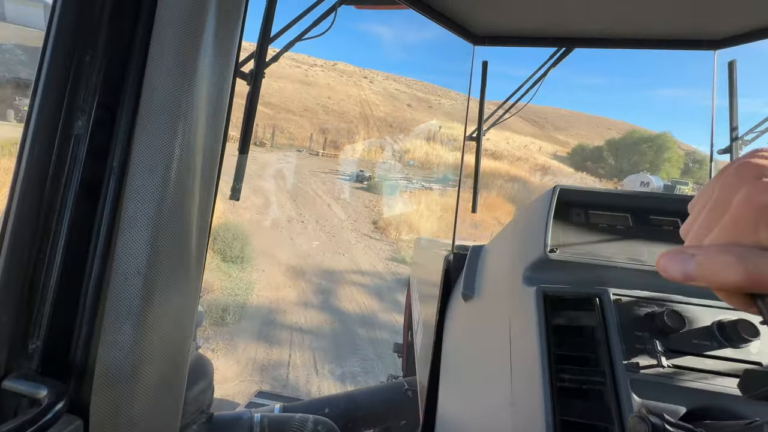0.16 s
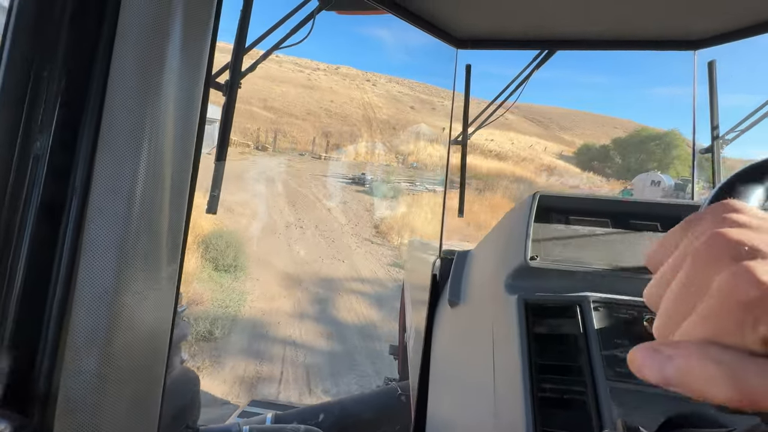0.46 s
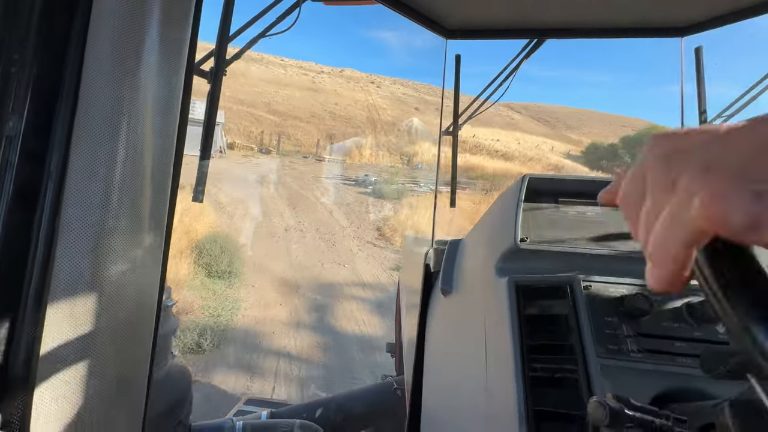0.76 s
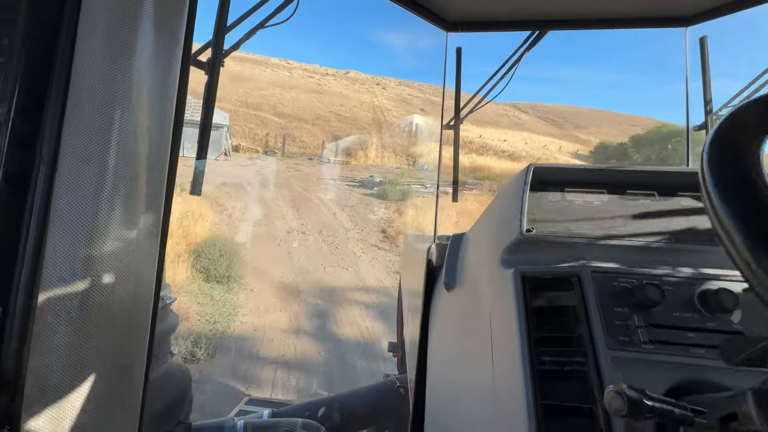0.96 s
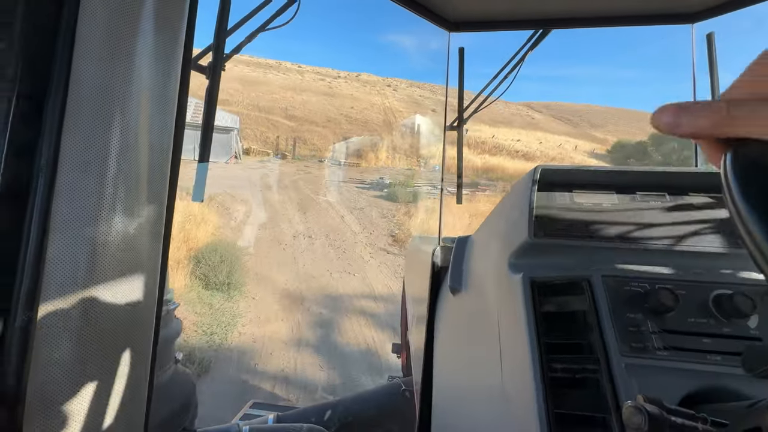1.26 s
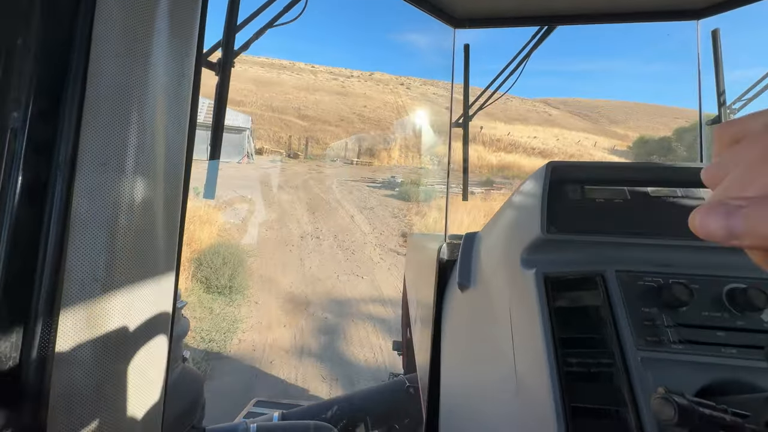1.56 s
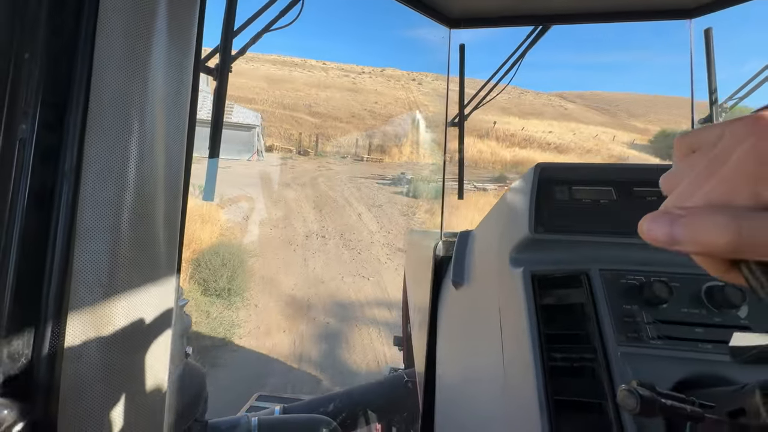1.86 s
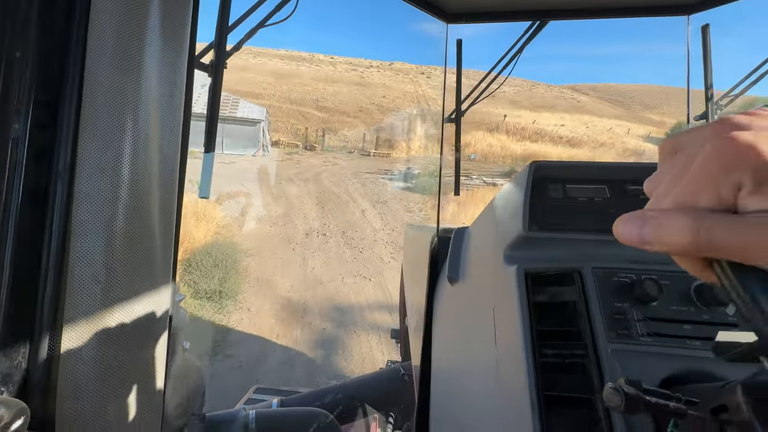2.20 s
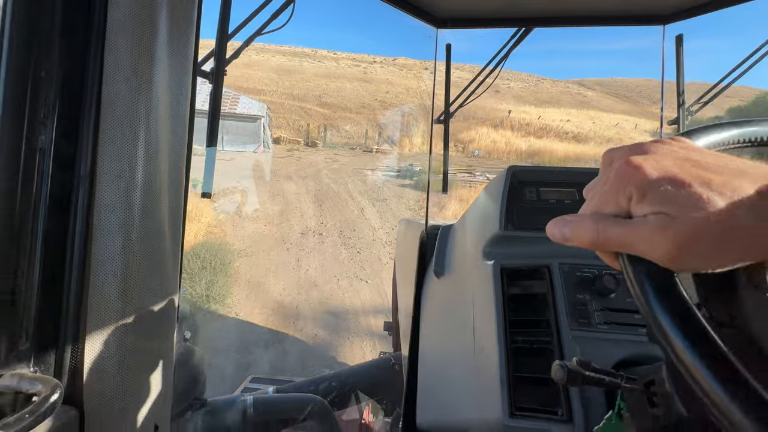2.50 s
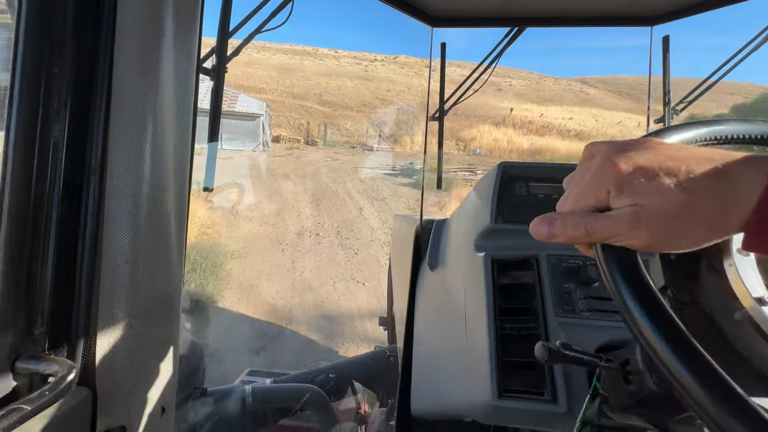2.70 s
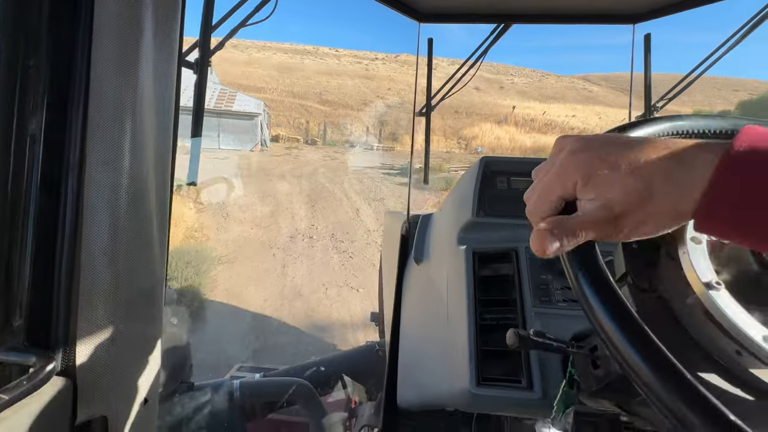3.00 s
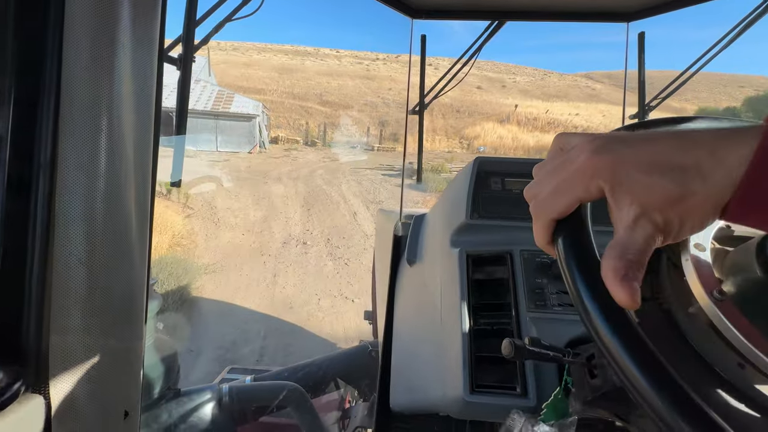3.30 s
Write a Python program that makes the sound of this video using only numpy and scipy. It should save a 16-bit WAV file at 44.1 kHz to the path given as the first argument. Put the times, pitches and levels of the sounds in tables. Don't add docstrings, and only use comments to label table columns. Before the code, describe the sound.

Steady heavy diesel engine drone heard in a tractor cab rolling over dirt, with small rattles.

```python
import sys
import numpy as np
from scipy import signal
from scipy.fft import rfft, irfft
from scipy.io import wavfile
from scipy.ndimage import uniform_filter1d

SR = 44100
rng = np.random.default_rng(int(sys.argv[2]) if len(sys.argv) > 2 else 0)


def log_audio(samples):
    frames = np.atleast_2d(samples).T
    limited = np.clip(frames, -1, 1)
    pcm = np.round(limited * 32767).astype(np.int16)
    wavfile.write(sys.argv[1], SR, pcm)


def volts_from_decibels(level):
    exponent = np.asarray(level, float) / 20
    return 10 ** exponent


N = 152145

# f/Hz, density/dB per Hz
ROAR_SPECTRUM = [(105, 5.5), (170, -7), (400, -9.5), (700, -11), (820, -12.5), (1200, -12.5), (1600, -19),
                 (2300, -22), (3600, -38)]
HISS_FOLLOWS = 0.57


def rms_one(x):
    return x / np.sqrt(np.mean(x ** 2) + 1e-20)


def in_time(rows):
    return np.interp(np.arange(N) / SR, *np.transpose(rows))


def at_hz(points, hz):
    table = np.array(points)
    return np.interp(np.log(hz), np.log(table[:, 0]), table[:, 1])


def drift(rate):
    r = np.exp(-80 * np.pi * rate / SR)
    slow = signal.lfilter([1], [1, -2 * r, r * r], rng.standard_normal(N // 40 + 2002))[2000:]
    return np.interp(np.arange(N) / 40, np.arange(len(slow)), rms_one(slow - slow.mean()))


def pan(left_db):
    return volts_from_decibels([[left_db / 2], [-left_db / 2]])


def band_pass(x, low, high, order=2):
    return signal.sosfilt(signal.butter(order, [low, high], "band", fs=SR, output="sos"), x)


def ring(clicks, hz, t60):
    r = volts_from_decibels(-60 / (t60 * SR))
    w = 2 * np.pi * hz / SR
    return signal.lfilter([0, np.sin(w)], [1, -2 * r * np.cos(w), r * r], clicks + 1e-18)


def tone(turns, db, left_db, lead):
    phase = 2 * np.pi * (turns + rng.random()) + np.array([[lead / 2], [-lead / 2]])
    return np.sqrt(2) * volts_from_decibels(db) * pan(left_db) * np.sin(phase)


def stereo_white():
    # f/Hz, left-right likeness/1
    likeness = [(60, .97), (165, .95), (300, .45), (700, .0), (1300, -.35), (2300, .05), (9000, .0)]
    port_lag_s, port_null_hz, port_from_hz, port_sharpness = .00034, 12650, 9600, 1.9
    hz = np.arange(N // 2 + 1) * SR / N + 1
    comb = np.cos(2 * np.pi * (hz - port_null_hz) * port_lag_s)
    ports = np.tanh(-port_sharpness * comb) * np.clip((hz - port_from_hz) / 1500, 0, 1)
    alike = np.clip(at_hz(likeness, hz) + ports, -.995, .995)
    mid, side = rfft(rng.standard_normal((2, N)))
    mid = irfft(mid * np.sqrt(1 + alike), N)
    side = irfft(side * np.sqrt(1 - alike), N)
    return np.array([mid + side, mid - side])


def banded_noise(spectrum, patchy_db, swing_db):
    # f/Hz, left minus right level/dB
    balance = [(110, 2), (250, -10.5), (700, 1.5), (1300, 5), (2200, 0.5), (4000, 4.5), (7300, 9),
               (9200, -6.5), (10500, 0)]
    out, together = 0, drift(11.0)
    white = [stereo_white(), stereo_white()]
    edges = np.geomspace(spectrum[0][0], min(spectrum[-1][0], 16500), num=17)
    for k, (low, high) in enumerate(zip(edges, edges[1:])):
        hz = np.sqrt(low * high)
        flicker_db = patchy_db * (0.29 * together + drift(26))
        band = band_pass(white[k % 2], low, high) * pan(at_hz(balance, hz))
        out = out + band * volts_from_decibels(at_hz(spectrum, hz) + flicker_db)
    return rms_one(out) * volts_from_decibels(swing_db)


def orders(cycles, load_db):
    multiples = [4, 6, 10, 12, 14, 15, 16, 20, 24, 26, 30, 32, 33, 34, 35, 36, 39, 40, 42, 46, 48, 51, 57,
                 58, 60, 72, 75, 76, 81, 45, 54, 56, 59, 63, 66, 68, 80, 96]
    # level/dB, left minus right/dB, left leads/rad
    order_sound = [(-40.3, 1.2, -0.0), (-18.8, 3.9, -0.2), (-47.5, 5.8, 0.3), (-49.7, -6.4, -1.4),
                   (-46.8, 4.0, 0.3), (-47, -3.0, -0.1), (-49.1, -5.1, 1.2), (-46.4, 4.1, 0.5),
                   (-50.6, -4.4, 0.2), (-50.4, -3.4, -0.8), (-46.7, 11.0, -3.1), (-50.4, -5.5, 2.4),
                   (-43, 9.4, -0.0), (-43.2, 3.8, -1.0), (-49.5, 0.4, -0.5), (-51.6, -2.8, 1.4),
                   (-43.3, 2.2, 0.8), (-52.4, 1.8, -1.5), (-53.3, 0.7, -1.1), (-49.7, 5.8, -2.8),
                   (-51.1, 1.7, 1.7), (-52.7, 7.7, 2.9), (-44, -1.6, -0.1), (-48, 2.1, -0.1),
                   (-52.1, 7.1, 2.8), (-54.4, -1.5, -2.5), (-57, 5.9, 2.8), (-54.2, 0.1, -1.9),
                   (-53.4, 4.9, -2.5), (-49, -4, -1.6), (-56, -1, .7), (-58, -3, -1), (-58, 2, .5),
                   (-58, -2, -2.6), (-57, 5, -1.6), (-55, -2, -1.9), (-53, 4, -2.6), (-56, 1, -2.8)]
    out = 0
    for k, (db, left_db, lead) in zip(multiples, order_sound):
        if k == 6:
            swing = .35 * drift(7.8) + 0.47 * load_db + 0.15
        else:
            swing = 1.1 * drift(3) + 0.29 * load_db - 1.5
        out = out + tone(k * cycles, db + swing, left_db, lead)
    return out


def faint_orders(cycles):
    level_db, spread_db = -44.5, 3
    k = np.arange(7, 140)
    height_db = at_hz(ROAR_SPECTRUM, k * 20.0) + spread_db * rng.standard_normal((2, len(k)))
    shape = np.zeros((2, 1025), complex)
    shape[:, k] = volts_from_decibels(height_db) * np.exp(2j * np.pi * rng.random((2, len(k))))
    loop = rms_one(irfft(shape))
    place = np.arange(2048) / 2048
    return volts_from_decibels(level_db) * np.array([np.interp(cycles % 1, place, c, period=1) for c in loop])


def panels(cycles, load_db):
    # f/Hz, t60/s, level/dB, left minus right/dB
    panel_modes = [(888, 0.17, -51, -13), (608, 0.038, -56.5, 25), (1197, .05, -56, -11),
                   (1472, 0.12, -59.5, -10), (1732, 0.081, -58.5, -13), (2013, 0.062, -61, -7),
                   (3148, 0.041, -67, 20)]
    cylinder_spread_db, firing_spread_db = 4, 2.5
    count = (6 * cycles).astype(int)
    at = np.flatnonzero(np.diff(count)) + 1
    cylinder = count[at] % 6
    out = 0
    for hz, t60, db, left_db in panel_modes:
        cylinder_db = cylinder_spread_db * rng.standard_normal(6)[cylinder]
        firing_db = firing_spread_db * rng.standard_normal(len(at))
        clicks = np.zeros(N)
        clicks[at] = volts_from_decibels(cylinder_db + firing_db) * rng.choice([-1, 1], 6)[cylinder]
        out = out + rms_one(ring(clicks, hz, t60)) * volts_from_decibels(db + load_db) * pan(left_db)
    return out


def fan_and_pumps(cycles, load_db):
    geared = [(133.4, -36.5, 0.3, -.2, .8), (350, -40.5, -7, -.9, 1.0), (454, -55, 5, -2.9, 2.0),
              (700, -50, 2, -2.2, 2.0), (1724, -60, 7, 2.6, 3.0), (1247, -58, 7, -2.8, 2.5)]
    seconds = cycles * 120 / 1848
    out = 0
    for hz, db, left_db, lead, wobble_db in geared:
        out = out + tone(hz * seconds, db + wobble_db * drift(16.0) + load_db, left_db, lead)
    return out


def steering_pump(cycles):
    # t/s, level/dB
    effort = [
        (0, -68),
        (2.3, -57),
        (2.6, -53),
        (2.9, -49),
        (3.2, -49.5),
        (3.45, -48.5),
    ]
    steer_lines = [(75, 3, 6, 2.2), (66, -4, 4, -1.5), (70, -2, 2, -.9), (51, -3, 8, -2), (64, -7, 5, 3),
                   (73, -9, 0, 2.5), (15, 0, -4, -.1), (17, -1, 2, -.7), (19, 0, -1, .2), (21, 0, 0, .7),
                   (18, -2, -5, .1)]
    oil_hz, oil_width_hz, oil_db = 2035, 150, 3
    effort_db = in_time(effort)
    oil = rms_one(ring(rng.standard_normal((2, N)), oil_hz, 2.2 / oil_width_hz))
    out = oil * volts_from_decibels(oil_db + effort_db)
    for k, db, left_db, lead in steer_lines:
        out = out + tone(k * cycles, effort_db + db + 3.4 * drift(3.0), left_db, lead)
    return out


def cab_air():
    # f/Hz, width/Hz, level/dB
    air_modes = [(56, 6.2, 6), (40.6, 5.3, -6), (64.3, 9.1, -5.5)]
    # t/s, level/dB
    bumps = [(0, -56), (.14, -28), (.34, -34), (.6, -31), (1.0, -39), (1.25, -41), (1.4, -30.5), (1.9, -32),
             (2.2, -28), (2.6, -31), (2.86, -24), (3.06, -36), (3.25, -25), (3.45, -46)]
    side_db = -15
    out = 0
    for hz, width, db in air_modes:
        settled = ring(rng.standard_normal(N + SR), hz, 1.9 / width)[SR:]
        out = out + volts_from_decibels(db) * rms_one(settled)
    out = band_pass(out, 32, 72)
    even = np.sqrt(uniform_filter1d(out ** 2, size=4000)) + .3 * np.std(out)
    side = rms_one(band_pass(rng.standard_normal(N), 30, 70))
    return (rms_one(out / even) + volts_from_decibels(side_db) * side * [[1], [-1]]) * volts_from_decibels(in_time(bumps))


def rumble():
    # t/s, level/dB
    roughness = [(0, -39.5), (.7, -38.5), (1.3, -41.5), (1.5, -39), (2.1, -43), (2.3, -35), (2.5, -39.5),
                 (2.9, -35), (3.1, -41), (3.3, -35), (3.45, -43)]
    band = band_pass(stereo_white(), 202, 355, order=3)
    return rms_one(band) * pan(-1.5) * volts_from_decibels(in_time(roughness) + .8 * drift(6))


def chinks():
    # t/s, peak level/dB, left minus right/dB, share of the full ring/1
    strikes = [
        (1.438, -55, 8, 1.1),
        (2.414, -38, 10, .8),
    ]
    # f/Hz, level/dB, t60/s
    metal_modes = [(6950, 2, .035), (7154, 3, .06), (7386, -2, .26), (7600, -8, .14), (7784, -6, .05),
                   (9000, -15, .03), (11400, -20, .05), (12800, -17, .012), (13600, -14, .012),
                   (14400, -9, .02), (15400, -11, .015)]
    contact_s, bounce_s, first_bounce_db, bounce_loss_db = .0036, .007, -10, 1.2
    out = np.zeros((2, N))
    grit = np.hanning(int(2 * contact_s * SR) + 3)
    bounce = np.arange(9)
    fall_db = first_bounce_db * np.sign(bounce) - bounce_loss_db * bounce
    for s, db, left_db, share in strikes:
        gaps = np.cumsum(np.r_[0, rng.uniform(.4, 1.6, 8)])
        at = ((s + share * bounce_s * gaps) * SR).astype(int)
        for hz, mode_db, t60 in metal_modes:
            touches = np.zeros(N)
            touches[at] = volts_from_decibels(db + mode_db - 23 + fall_db + rng.normal(0, 2.0, 9))
            contact = signal.fftconvolve(touches, grit)[:N] * rng.standard_normal(N)
            out += ring(contact, hz, t60 * share) * pan(left_db)
    return out


def ticks():
    # t/s, peak level/dB, centre f/Hz, length/s, width/octaves
    creaks = [(.17, -59, 9000, 0.022, 0.98), (0.47, -57, 8000, .015, .9), (1.4, -45, 6000, .006, .6),
              (1.432, -56.5, 10100, 0.096, 0.53), (1.833, -52, 10500, .005, .9),
              (1.896, -49.5, 10500, 0.016, .9), (2.063, -47, 7070, 0.017, 0.11),
              (2.11, -55, 8850, 0.013, .08), (2.181, -53, 8950, 0.0087, .9),
              (2.414, -50, 11800, 0.0046, 1.2), (2.42, -53, 3700, 0.085, .08),
              (2.807, -51, 12000, 0.012, 1.3), (2.805, -55, 7000, .012, 0.085),
              (2.862, -53, 10800, 0.016, .25), (2.862, -49.5, 6800, .018, .5),
              (3.369, -56.5, 11000, 0.024, .12), (3.37, -54, 5440, .02, .15),
              (3.364, -50, 10000, .014, 1.4)]
    out, t, white = 0, np.arange(N) / SR, stereo_white()
    for s, db, hz, length, octaves in creaks:
        since = np.maximum(t - s, 0)
        shape = (1 - np.exp(-since / 0.00051)) * np.exp(-(since / length) ** 2)
        high = min(hz * 2 ** (.3 * octaves), 15500)
        band = band_pass(white, hz / 2 ** (0.77 * octaves), high)
        out = out + volts_from_decibels(db) * shape * rms_one(band)
    return out * volts_from_decibels(2.0 * drift(150))


def sung_noise(resonances, load_db):
    out = 0
    for hz, width, db, left_db in resonances:
        band = rms_one(ring(rng.standard_normal(N), hz, 2.2 / width))
        out = out + band * volts_from_decibels(db + load_db * HISS_FOLLOWS + 2.0 * drift(3.6)) * pan(left_db)
    return out


def sheet_hums(load_db):
    # f/Hz, width/Hz, level/dB, left minus right/dB
    sheet_modes = [(886, 24, -49, 0), (515, 22, -51, 5), (600, 16, -53, 2), (305, 25, -47, 2)]
    return sung_noise(sheet_modes, load_db)


def whistles(load_db):
    # f/Hz, width/Hz, level/dB, left minus right/dB
    trim_modes = [(2896, 100, -71.5, 19), (3655, 53, -75, 7), (4960, 73, -71.5, 1), (6000, 69, -72.5, 5),
                  (7200, 65, -85, 11), (9000, 110, -76, -2)]
    return sung_noise(trim_modes, load_db)


def roar(cycles, load_db):
    throb_db = .8 * np.cos(12 * np.pi * cycles)
    return banded_noise(ROAR_SPECTRUM, patchy_db=.4, swing_db=-33 + load_db + throb_db)


def hiss(load_db):
    # f/Hz, density/dB per Hz
    hiss_spectrum = [(2500, -6), (3500, -1), (4400, -6), (7000, -8), (9000, -11), (11500, -14.5),
                     (14000, -17), (15800, -20)]
    return banded_noise(hiss_spectrum, patchy_db=1.33, swing_db=-52.5 + load_db * HISS_FOLLOWS)


def scene():
    # t/s, speed/rev per min
    speed = [(0.25, 1847.0), (0.5, 1850.0), (0.75, 1849.0), (1.0, 1858.0), (1.25, 1855.0), (1.5, 1845.0),
             (1.75, 1845.0), (2.0, 1850.0), (2.25, 1847.0), (2.5, 1844.0), (2.75, 1838.0), (3.0, 1838.0),
             (3.25, 1846.0)]
    # t/s, level/dB
    load = [(0.0, -43), (2.46, -40.5), (3.45, -39)]
    cycles = np.cumsum(in_time(speed)) / 120 / SR
    load_db = in_time(load) - in_time(load).mean()
    engine = orders(cycles, load_db) + faint_orders(cycles) + panels(cycles, load_db)
    driven = fan_and_pumps(cycles, load_db) + steering_pump(cycles)
    ground = cab_air() + rumble()
    loose = chinks() + ticks()
    background = sheet_hums(load_db) + whistles(load_db) + roar(cycles, load_db) + hiss(load_db)
    return engine + driven + ground + loose + background


def roll_off(x):
    return signal.sosfilt(signal.butter(12, 15850, fs=SR, output="sos"), x)


def record(dry):
    edge_s = .006
    to_edge = np.minimum(np.arange(N), N - np.arange(N)) / (edge_s * SR)
    edge = np.sin(np.pi / 2 * np.clip(to_edge, 0, 1)) ** 2
    return roll_off(dry * edge)


dry = scene()
out = record(dry)
log_audio(out)
```